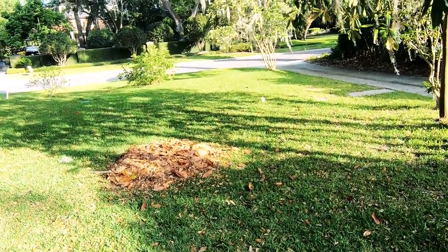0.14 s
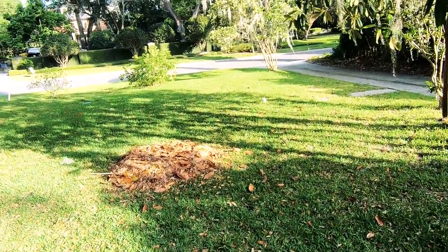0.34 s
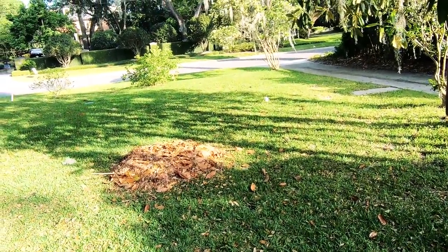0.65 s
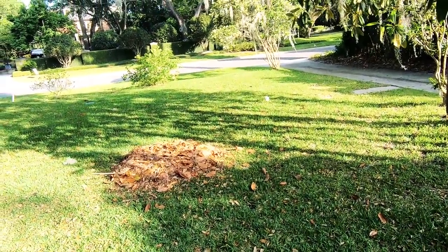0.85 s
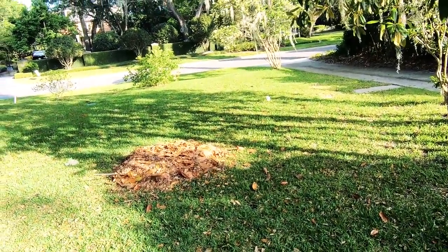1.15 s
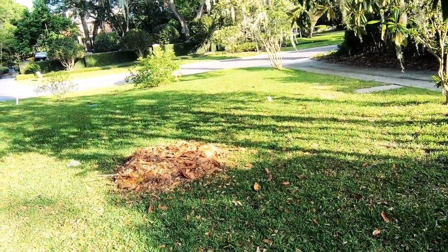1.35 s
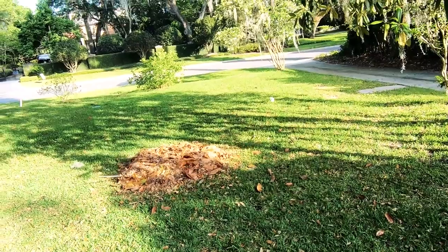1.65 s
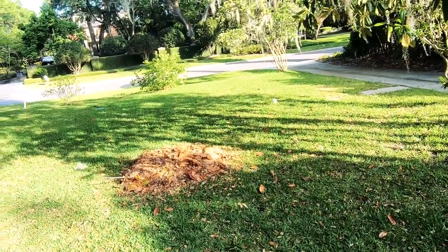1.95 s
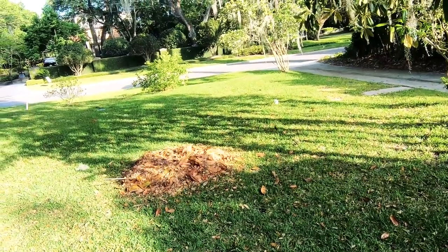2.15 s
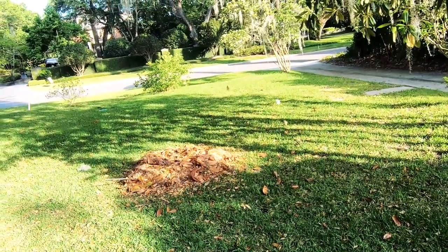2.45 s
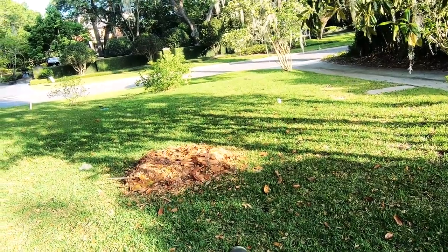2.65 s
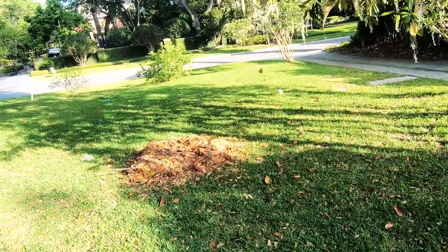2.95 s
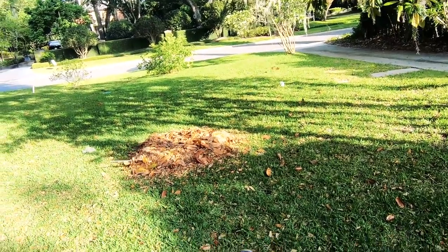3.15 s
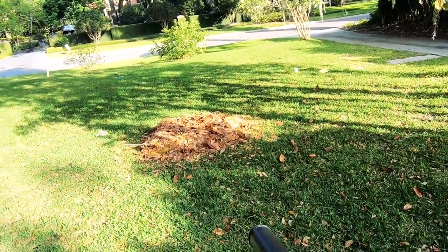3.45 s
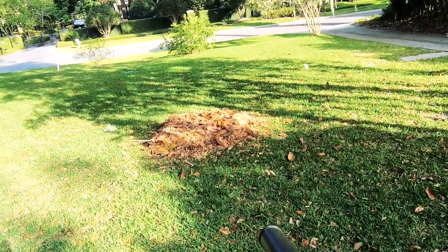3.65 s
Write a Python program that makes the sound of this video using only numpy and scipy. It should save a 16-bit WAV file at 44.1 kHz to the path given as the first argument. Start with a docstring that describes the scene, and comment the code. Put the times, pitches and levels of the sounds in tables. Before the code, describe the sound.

Close leaf blower revs from a soft, slowing whir to a loud, steady airy whine.

```python
"""On a quiet lawn, a battery leaf blower close at hand coasts slowly, then runs up to full speed; its trigger clicks on the way.
The unbalanced shaft hums, and blades and motor poles whine on multiples of it: sines share one integrated shaft phase.
Air roars through the resonant housing and tube: shaped noise in bands that grow with the flow.
Behind lie the soft noise of the lawn and a faint far-off drone."""
import sys
import numpy as np
from scipy import signal
from scipy.fft import rfft, irfft
from scipy.io import wavfile
from scipy.ndimage import uniform_filter1d

SR = 44100
rng = np.random.default_rng(int(sys.argv[2]) if len(sys.argv) > 2 else 0)


def materialize(psi):
    """Save the field psi as 16-bit PCM at rate SR to the path in sys.argv[1].

    A 1-D psi becomes a single channel; in a 2-D psi each row is a channel.
    """
    bounded = np.clip(np.atleast_2d(psi).T, -1, 1)
    quanta = np.round(bounded * 32767).astype(np.int16)
    wavfile.write(sys.argv[1], SR, quanta)


N = 167580
T = np.arange(N) / SR  # time, s
HZ = np.arange(N // 2 + 1) * SR / N + 1e-3  # spectrum bins, kept above 0 for the logarithm


def undb(db):
    """Level law: 20 dB is a factor of ten in amplitude."""
    return 10 ** (np.asarray(db) / 20)


def on_log(table, hz):
    """Logarithmic pitch scale: read (Hz, value) rows by straight lines on a log-frequency axis."""
    rows = np.array(table, float)
    return np.interp(np.log(hz), np.log(rows[:, 0]), rows[:, 1])


def over_time(table):
    """Linear interpolation: read (s, value) rows at every sample."""
    return np.interp(T, *np.array(table).T)


def walk(rate):
    """Band-limited fluctuation: random levels held 1 / rate s and smoothed twice, standard deviation 1."""
    hold = int(SR / rate)
    steps = np.repeat(rng.standard_normal(N // 50), hold)[:N]
    smooth = uniform_filter1d(uniform_filter1d(steps, hold), hold)
    return smooth / smooth.std()


def swell(times):
    """Amplitude envelope: linear rise, hold and fall through four times in seconds."""
    return np.interp(T, np.sort(times), [0, 1, 1, 0])


def sine(cycles, db):
    """Simple harmonic motion: a sine of this RMS level, from its phase in cycles and a random start."""
    return np.sqrt(2) * undb(db) * np.sin(2 * np.pi * (cycles + rng.random()))


# Stereo spread of noise. Each row: frequency in Hz, level of the side part against the common part in dB.
SIDE_LEVEL = [(40, -26), (70, -2), (110, -30), (200, -5), (380, -22), (700, -31), (1290, -48), (2700, -61),
              (4400, -33), (8120, -22.5), (10800, -21), (12000, -2), (15000, -1)]


def coloured(db_per_hz, total_db):
    """Spectral shaping of white noise: spectra of a common part plus a side part of opposite sign left and right."""
    mid, side = rfft(rng.standard_normal((2, N))) * undb(db_per_hz)
    both = mid + side * undb(on_log(SIDE_LEVEL, HZ)) * np.array([[1], [-1]])
    # the common part alone is brought to total_db
    return both * undb(total_db) / irfft(mid, N).std()


# Resonances of housing and tube. Each row: centre in Hz, full width at half the dB lift in Hz, lift in dB.
RESONANCES = [(341, 31, 9), (460, 19, 16.5), (676, 79, 6.5), (820, 71, 0), (1020, 120, 2), (1318, 55, 3),
              (1675, 24, 5.5), (2908, 125, 8.5), (3153, 95, 9.5), (3630, 77, 6.5), (4270, 62, 8),
              (4580, 78, 8.5), (5250, 310, 6), (5880, 460, -0.5), (7620, 420, -3), (8350, 160, 4)]


def lift(hz):
    """Resonance: the dB that housing and tube add at a pitch, as a sum of bell-shaped peaks."""
    return sum(db / (1 + (2 * (hz - centre) / width) ** 2) for centre, width, db in RESONANCES)


# The shaft coasts, runs up, overshoots a little and sags with the battery.
# Each row: time in seconds, shaft speed in Hz (turns per second).
SHAFT_SPEED = [(0, 133), (.185, 128.5), (.21, 137), (.3, 165), (.44, 234), (.6, 325), (.67, 368),
               (.726, 419), (.76, 433), (.83, 439.5), (1.3, 437.8), (2.3, 437.1), (3.8, 436.3)]


def shaft_speed():
    """Rotational inertia: the speed of the shaft in Hz, its corners rounded over 1200 samples."""
    return uniform_filter1d(over_time(SHAFT_SPEED), size=1200)


# Level of the shaft hum. Each row: time in seconds, level in dB.
HUM_LEVEL = [(0, -60), (.25, -50), (.3, -51), (.38, -36), (.44, -28.5), (.515, -26.5), (.6, -32),
             (.67, -19.5), (.71, -15), (.8, -18.5), (1.3, -19), (1.8, -18.5), (1.95, -19.5), (3.4, -18.5),
             (3.58, -20.5), (3.8, -19.5)]


def shaft_hum(turns):
    """Rotating unbalance: an off-centre mass shakes the machine once a turn."""
    return sine(turns, over_time(HUM_LEVEL) + 0.24 * walk(30.4))


BLADES = 12
# Level of the blade whine. Each row: time in seconds, level in dB.
BLADE_LEVEL = [(.38, -70), (.47, -36), (.55, -58), (.65, -47), (.7, -51), (.76, -44), (.9, -46), (1.2, -47),
               (1.35, -51), (1.6, -49), (1.8, -52), (2, -46), (2.2, -54), (2.65, -52.5), (2.83, -42),
               (3, -49), (3.2, -46), (3.45, -49), (3.8, -56)]


def blade_whine(turns):
    """Blade passing: each turn gives one cycle per blade, unsteady in phase and level."""
    return sine(BLADES * turns + 0.12 * walk(60), over_time(BLADE_LEVEL) + 2.1 * walk(35))


FULL_HZ = 437  # shaft speed at which the whine levels hold
# Whine on the shaft's harmonics. Each row: multiple of the shaft, level at full speed in dB,
# growth in dB per doubling of speed, waver in dB, wavers per second, phase wander in cycles.
HARMONICS = [(2, -52.5, 6, 2, 25, 0.18), (3, -36, 21, 2, 15, 0.12), (4, -43, 20, 1.5, 20, 0.084),
             (6, -55, 20, 6.5, 20, 0.11), (24, -62, 40, 3.5, 60, .25), (31, -79, 30, 6, 30, .2)]


def harmonic_whine(turns, speed):
    """Harmonics: multiples of the shaft waver as air buffets the blades and swell on the housing's resonances."""
    out = 0
    for multiple, db, growth_db, waver_db, rate, wander in HARMONICS:
        growth = growth_db * np.log2(speed / FULL_HZ)
        resonance = lift(multiple * speed) - lift(multiple * FULL_HZ)
        level = db + growth + resonance + waver_db * walk(rate)
        out = out + sine(multiple * turns + wander * walk(rate), level)
    return out


# Motor poles, heard while the motor pulls hard from low speed.
# Each row: multiple of the shaft, level in dB, (start, full, ease, gone) in seconds.
POLE_TONES = [(3, -41, (.36, .4, .54, .6)), (15, -47, (.19, .26, .42, .49)), (30, -61, (.2, .23, .29, .33))]
# Brief tones during the coast. Each row: multiple of the shaft, level in dB, (start, full, ease, gone) in seconds.
COAST_TONES = [(12, -60, (.02, .07, .16, .2)), (24, -59, (.02, .07, .16, .2))]


def passing_tones(turns):
    """Harmonics of rotation: pole and coast tones keep to multiples of the shaft and swell briefly."""
    return sum(swell(times) * sine(multiple * turns, db + 2.5 * walk(40))
               for multiple, db, times in POLE_TONES + COAST_TONES)


SWITCHING_HZ, SWITCHING_DB, BEAT_DB = 7860, -71, -51
# Envelopes of the switching tone and of its difference tone: start, full, ease and gone, in seconds.
SWITCHING_TIMES = (.07, .25, .48, .62)
BEAT_TIMES = (.2, .24, .3, .34)


def switching(turns):
    """Intermodulation: a fixed switching tone, and its difference with the highest pole tone, falling as speed rises."""
    fixed = swell(SWITCHING_TIMES) * sine(SWITCHING_HZ * T, SWITCHING_DB + 2.9 * walk(19))
    difference = SWITCHING_HZ * T - POLE_TONES[-1][0] * turns
    return fixed + swell(BEAT_TIMES) * sine(difference, BEAT_DB)


AIR_DB, GUST_DB, FLICKER_DB = -27, .3, 0.85  # overall level, waver shared by all bands, waver of each band
# Colour of the air noise before resonance. Each row: frequency in Hz, relative level in dB per Hz.
AIR_COLOUR = [(18, -64), (30, -38), (60, -40.5), (150, -16.5), (250, -19), (400, -21.5), (550, -16),
              (900, -16), (1200, -18), (1600, -19), (2500, -23), (3400, -25), (5000, -35), (6000, -39),
              (7450, -44), (9500, -43), (10900, -46), (11300, -47), (13500, -54), (14500, -55),
              (15500, -76)]
# Growth of the roar. Each row: frequency in Hz, growth in dB per doubling of the flow.
ROAR_GROWTH = [(50, 1.5), (200, 14.5), (800, 10.5), (3000, 9), (7000, 15), (13000, 15.5)]
# Air flow over time. Each row: time in seconds, flow in doublings relative to full (negative below full).
AIR_FLOW = [(0, -2.03), (.1, -2.4), (.22, -1.7), (.3, -1.23), (.4, -0.75), (.5, -0.41), (.6, -0.12),
            (.7, 0.12), (1, -0.038), (3.8, 0.029)]


def roar():
    """Turbulence: broadband air noise in overlapping half-octave bands, each growing with the flow at its own rate."""
    air = coloured(on_log(AIR_COLOUR, HZ) + lift(HZ), AIR_DB)
    flow = over_time(AIR_FLOW)
    gust = GUST_DB * walk(2.605)
    out = 0
    for step in np.arange(9, 29):  # half octaves above 1 Hz
        triangle = np.clip(1 - abs(2 * np.log2(HZ) - step), 0, 1)
        band = irfft(air * triangle, N)
        growth = on_log(ROAR_GROWTH, 2 ** (step / 2)) * flow
        out = out + band * undb(growth + gust + FLICKER_DB * walk(9))
    return out


CLICK_S, CLICK_DB = .3497, -42  # start, and level added to every mode
# Modes of the plastic trigger. Each row: frequency in Hz, relative level in dB, time to fall 60 dB in seconds.
TRIGGER_MODES = [(5200, -2, 0.013), (6900, -3, 0.011), (8400, 0, .007), (9100, 4, .007), (9900, 4, .007),
                 (10700, -15, .06), (12200, -15, .007), (13500, -18, .007)]


def click():
    """Modal decay: the plastic trigger snaps home and its modes ring down exponentially."""
    t = np.clip(T - CLICK_S, 0, None)
    rings = 0
    for hz, db, t60 in TRIGGER_MODES:
        rings = rings + undb(db - 60 * np.minimum(t / t60, 5)) * np.sin(2 * np.pi * hz * t)
    onset = np.minimum(t / .0004, 1)
    return undb(CLICK_DB) * rings * onset


LAWN_DB = -41.5
# Colour of the quiet lawn. Each row: frequency in Hz, relative level in dB per Hz.
LAWN_COLOUR = [(20, -40), (35, -10), (60, -14.5), (200, -9), (330, -14), (500, -18), (1000, -23),
               (1800, -23.5), (3000, -39), (6000, -55), (15000, -97)]


def lawn():
    """Ambient noise: steady random sound, strongest in the bass."""
    return irfft(coloured(on_log(LAWN_COLOUR, HZ), LAWN_DB), N)


# Faint far-off drone. Each row: frequency in Hz, peak level in dB.
DRONE_TONES = [(184, -53.5), (291, -49.5), (586, -56)]


def drone():
    """Amplitude and phase modulation: low tones from the neighbourhood waver at random."""
    out = 0
    for hz, db in DRONE_TONES:
        phase = 2 * np.pi * (hz * T + 0.073 * walk(12))
        out = out + undb(db + 3.9 * walk(12)) * np.sin(phase)
    return out


def scene():
    """Superposition: the pressures of blower, lawn and drone add."""
    speed = shaft_speed()
    turns = np.cumsum(speed) / SR
    tones = shaft_hum(turns) + blade_whine(turns) + harmonic_whine(turns, speed)
    tones = tones + passing_tones(turns) + switching(turns)
    return tones + roar() + click() + lawn() + drone()


TOP_HZ = 15644


def record(dry):
    """Band limiting: a steep elliptic low-pass removes the extreme treble."""
    return signal.sosfilt(signal.ellip(10, .2, 80, TOP_HZ, fs=SR, output="sos"), dry)


dry = scene()
out = record(dry)
materialize(out)
```